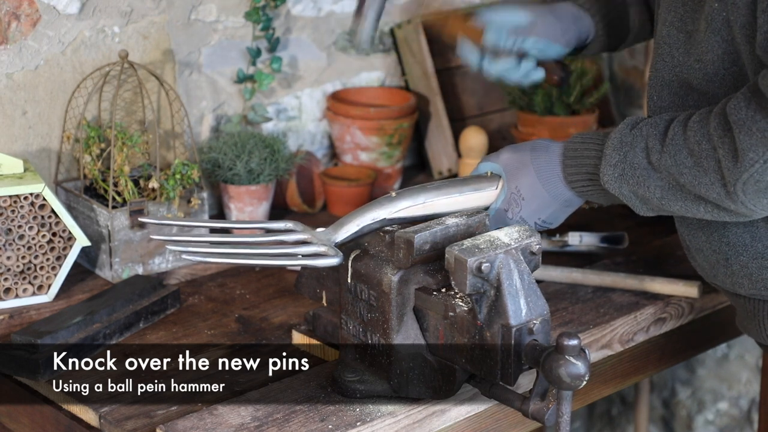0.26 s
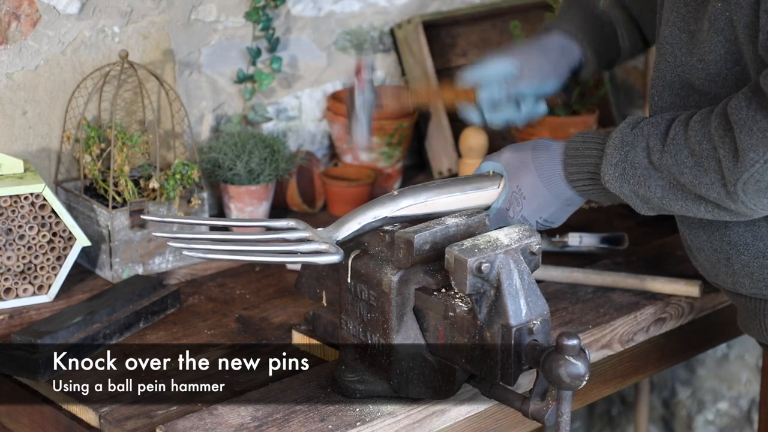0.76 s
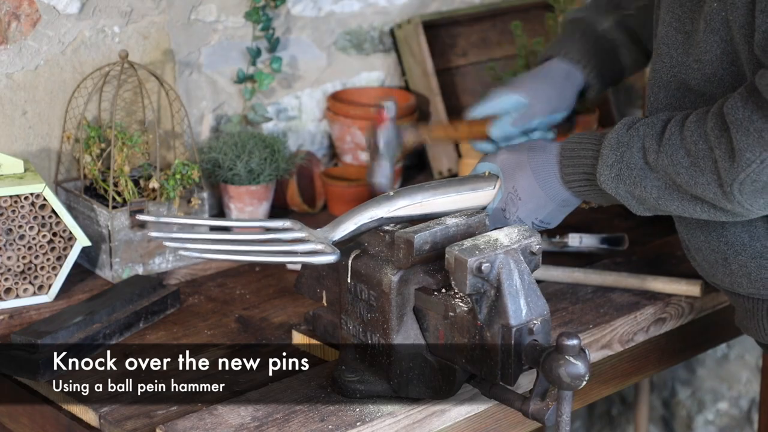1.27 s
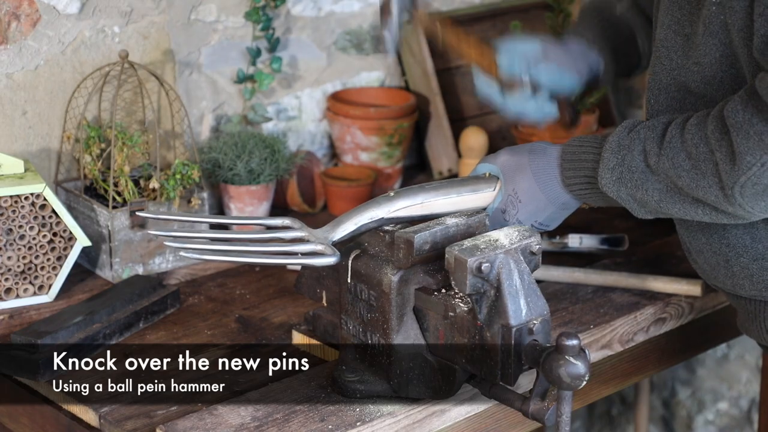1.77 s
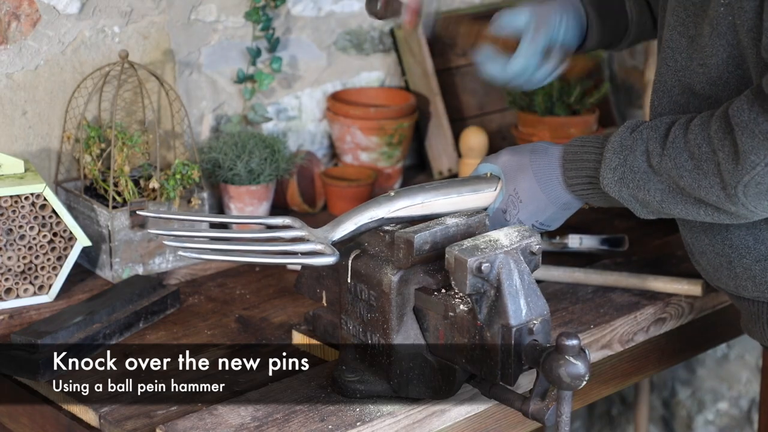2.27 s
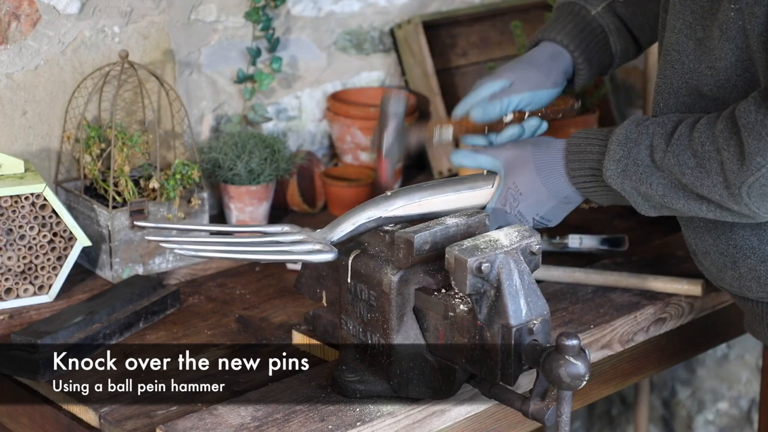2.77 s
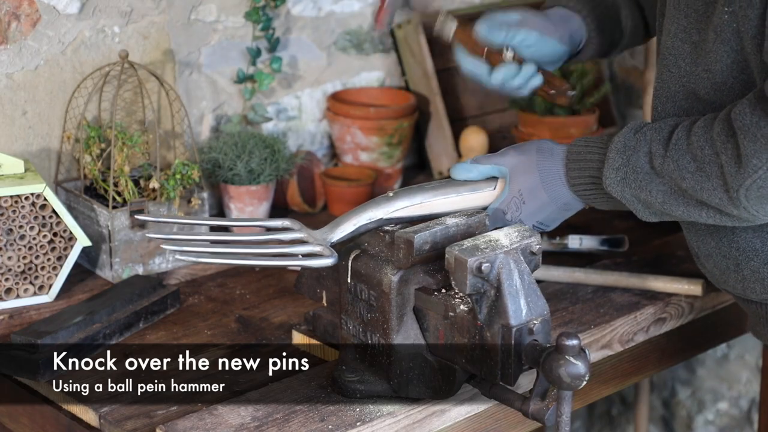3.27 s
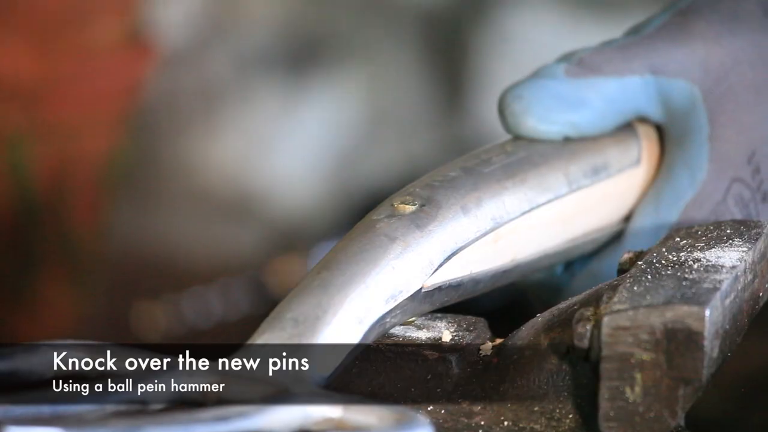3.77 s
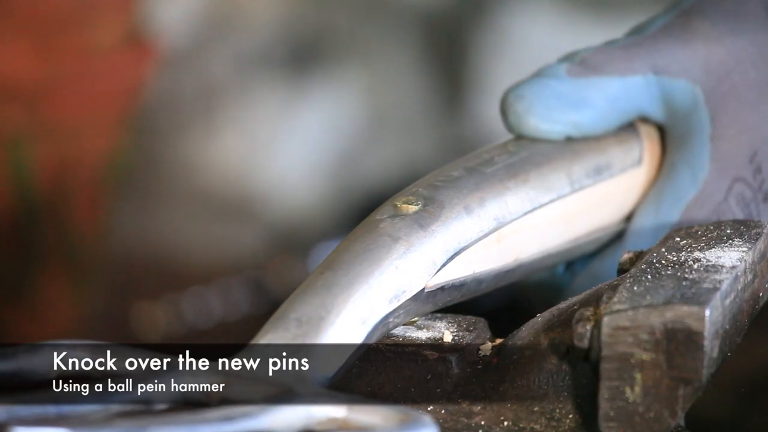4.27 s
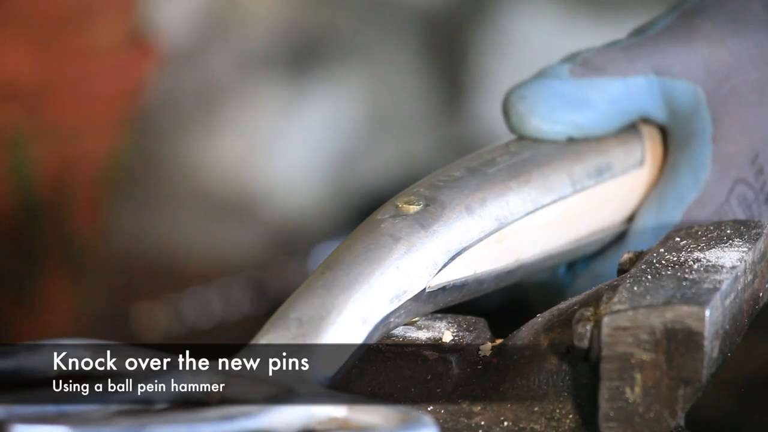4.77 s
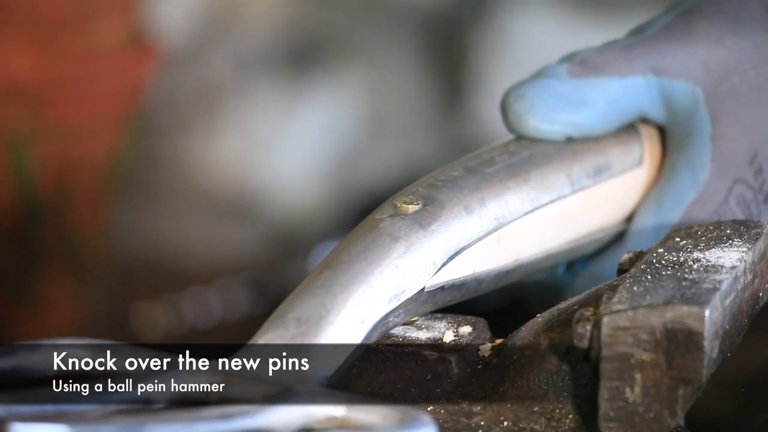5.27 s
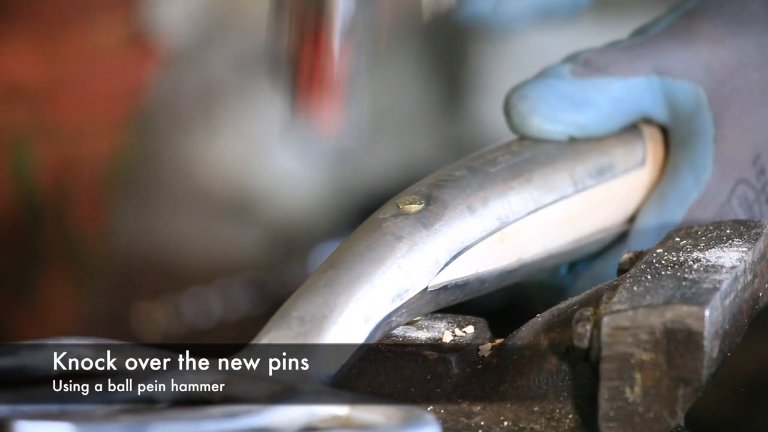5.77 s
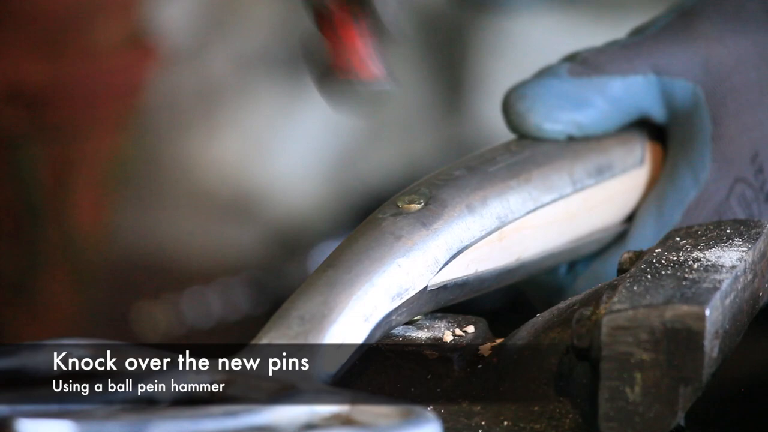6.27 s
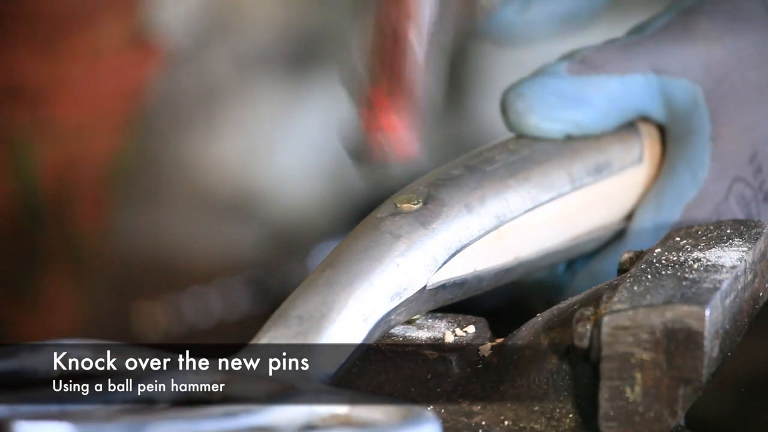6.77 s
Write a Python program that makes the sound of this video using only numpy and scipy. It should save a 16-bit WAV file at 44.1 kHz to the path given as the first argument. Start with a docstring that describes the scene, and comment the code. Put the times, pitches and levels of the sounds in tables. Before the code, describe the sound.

In a small workshop, a hammer strikes a brass pin set in a steel fork socket resting on a vice. Eight quick, even blows come first, then nearly a second's gap, one light tap and a second steady run to the end. Each is a hard mid-pitched clank with a bright crack, slight thin ringing and a short room tail. The microphone is close and the loudest blows slightly overload it.

```python
"""A hammer peens a brass pin in the steel socket of a garden fork that rests on a vice, in a small workshop.
Each blow is a click that rings the damped modes of socket, vice and bench and starts a burst of crack noise.
Thin resonances ring in tines, shank, vice jaw, hammer head and socket; near echoes and a noise tail make the room.
Shaped noise is the room tone, and the loudest swings overload the microphone input lopsidedly."""
import sys
import numpy as np
from scipy import signal
from scipy.fft import rfft, irfft
from scipy.io import wavfile

SR = 44100
rng = np.random.default_rng(int(sys.argv[2]) if len(sys.argv) > 2 else 0)


def inscribe(sig):
    """Save sig as 16-bit PCM at rate SR to the path in sys.argv[1].

    A 1-D sig is mono; a 2-D sig holds one channel per row.
    Samples are clipped to [-1, 1] before scaling.
    """
    pcm = np.round(np.clip(np.atleast_2d(sig).T, -1, 1) * 32767)
    wavfile.write(sys.argv[1], SR, pcm.astype(np.int16))


def volts(x):
    """Linear amplitude factor 10**(x/20) for a level x in dB, scalar or array-like."""
    e = np.asarray(x, float) / 20
    return 10 ** e


N = 308700  # samples, 7 s

# The hammer blows. Each row: start in seconds, strength in dB, hardness of contact in dB,
# base level of the tine ring in dB, base level of the tine tip ring in dB.
BLOWS = [(0.0178, -1.84, -8.5, -37, -54.5), (0.3153, -0.74, -1.5, -56.5, -71.5),
         (0.6077, -1, 4.5, -52.5, -62), (0.897, 0, 4, -42, -57), (1.1799, 0.26, 4, -37.5, -53.5),
         (1.464, 0, 4, -37.5, -60), (1.7529, -2.5, -2.5, -54, -70), (2.0367, -0.7, 4.5, -46.5, -48.5),
         (2.9947, -13, -1.5, -79, -92), (3.3101, -4, -2.5, -52, -63), (3.6014, -1.3, 2, -63.5, -72),
         (3.8807, 0, 5.5, -61, -71), (4.155, 0, 1, -33.5, -66), (4.4353, -0.5, 3.5, -43.5, -75),
         (4.7105, -3.5, -1.2, -55.5, -78.5), (4.9866, -1, 0.5, -65, -76.5), (5.2576, -0.7, 0.5, -39, -61.5),
         (5.5357, -1.5, 3, -59.5, -78.5), (5.847, -0.4, 4, -55, -75), (6.1238, -2.5, -12, -77.5, -79),
         (6.4146, -0.9, 7.5, -59, -80.5), (6.6906, -2, 5.5, -60, -75), (6.9747, -2, 2.5, -55.5, -74)]


def kicks(blow_db):
    """The hammer hits: one click per blow, over a floor too small to hear."""
    clicks = np.full(N, 1e-18)
    clicks[[round(row[0] * SR) for row in BLOWS]] = volts(blow_db)
    return clicks


def ring(modes, blow_db, spread_db):
    """Every blow strikes every mode, a little differently; neighbouring modes start in opposite sense."""
    out = np.zeros(N)
    chance = rng.standard_normal((len(BLOWS), len(modes)))
    for k, (hz, level_db, t60) in enumerate(modes):
        sense = (-1) ** k
        clicks = sense * kicks(blow_db + level_db + spread_db * chance[:, k])
        # two-pole resonator: a sine that falls 60 dB in t60
        radius = volts(-60 / (t60 * SR))
        angle = 2 * np.pi * hz / SR
        out += signal.lfilter([0, np.sin(angle)], [1, -2 * radius * np.cos(angle), radius ** 2], clicks)
    return out


def dying(clicks, t60):
    """Every click starts an envelope that falls 60 dB in t60 seconds."""
    return signal.lfilter([1], [1, -volts(-60 / (t60 * SR))], clicks)


def at_hz(points, hz, column=1):
    """Read a table column on a log-frequency axis."""
    points = np.array(points)
    return np.interp(np.log(hz), np.log(points[:, 0]), points[:, column])


def coloured(x, points):
    """Give a signal the spectrum of a table."""
    hz = np.maximum(np.fft.rfftfreq(len(x), 1 / SR), 1)
    return irfft(rfft(x) * volts(at_hz(points, hz)), len(x))


def in_time(curve, s):
    """Read a curve at the given times."""
    return np.interp(s, *np.transpose(curve))


# Socket, vice and bench, damped by hand and wood.
# Each row: frequency in Hz, level relative to the blow in dB, t60 in seconds.
BODY = [(97.2, -36.5, 0.31), (154.16, -29.5, 0.42), (219, -38.5, 0.12), (270, -26, 0.048),
        (379.2, -17.5, 0.091), (461, -27.5, 0.057), (607.6, -18, 0.17), (686, -20.5, 0.053),
        (743, -19.5, 0.14), (764, -22.5, 0.048), (986, -23.5, 0.041), (1029.5, -17.5, 0.24),
        (1045.2, -10.5, 0.072), (1150.6, -12.5, 0.066), (1204.5, -21.5, 0.19), (1368, -18, 0.052),
        (1575, -32.5, 0.15), (1850, -16.5, 0.075), (1944, -12, 0.032), (2200, -18, 0.044),
        (2440, -20, 0.061), (2600, -14.5, 0.04), (2740, -14.5, 0.035), (2890, -17, 0.06),
        (3273, -14, 0.041), (3500, -27, 0.014), (4060, -24, 0.08), (4200, -33, 0.0083), (5700, -31, 0.062),
        (7150, -33.5, .02)]


def body_knock(strength):
    """The heavy knock: damped modes of socket, vice and bench."""
    return ring(BODY, strength, spread_db=1.0)


# Colour of the contact crack. Each row: frequency in Hz, relative density in dB per Hz.
CRACK = [(600, -40), (1500, -19.5), (2500, -12), (3500, -5.5), (5000, -13), (8000, -18), (12000, -29.5),
         (17000, -34.5)]


def crack(blow_db, level_db=-4, t60=0.046):
    """Steel on brass and socket on jaws: a short burst of noise, new each time."""
    noise = coloured(rng.standard_normal(N), CRACK)
    return dying(kicks(blow_db + level_db), t60) * noise


def seated(x, touch_db=-22, seat_ms=0.69):
    """The face touches the pin lightly; the full blow lands when the socket seats on the vice."""
    full_blow = np.pad(x, (round(seat_ms * SR / 1000), 0))[:N]
    return volts(touch_db) * x + full_blow


# Tines, free steel. Each row: frequency in Hz, offset from the tine ring level of the blow in dB, t60 in seconds.
TINES = [(3323, -2, .75), (8050, -22, .3)]
# Tine tips. Each row: frequency in Hz, offset from the tip ring level of the blow in dB, t60 in seconds.
TINE_TIPS = [(5464, 0, .7)]


def tine_rings(tines, tips):
    """Tines and their tips sing thinly, at levels set blow by blow."""
    return ring(TINES, tines, spread_db=.4) + ring(TINE_TIPS, tips, spread_db=.4)


# Shank, free steel. Each row: frequency in Hz, offset from the curve below in dB, t60 in seconds.
SHANK = [(2121, -6, .42)]
# Shank ring as the hand tightens and eases. Each row: time in seconds, base level under a 0 dB blow in dB.
SHANK_RING = [(0, -45), (1.1, -37.5), (1.5, -30), (3.0, -25), (3.6, -26), (3.88, -21), (4.16, -31.5),
              (4.5, -39), (6.4, -37), (6.7, -28)]


def shank_ring(s, strength):
    """The shank rings more or less as the hand grips it."""
    return ring(SHANK, strength + in_time(SHANK_RING, s), spread_db=1)


# The vice jaw. Each row: frequency in Hz, offset from the curve below in dB, t60 in seconds.
VICE = [(1030, 0, .55)]
# Vice tone as the fork shifts on the jaw. Each row: time in seconds, base level under a 0 dB blow in dB.
VICE_RING = [(0, -43.5), (2.0, -38.5), (4.2, -39), (4.451, -45.5), (5.9, -45.5), (6.101, -33), (7, -37)]


def vice_tone(s, strength):
    """The vice jaw keeps a faint tone that varies as the fork shifts on it."""
    return ring(VICE, strength + in_time(VICE_RING, s), spread_db=1)


# Hammer head, free steel. Each row: frequency in Hz, offset from the curve below in dB, t60 in seconds.
HEAD = [(10060, -3, .5), (10150, -1, .4), (6856, 2, .4)]
# Head ring, which wakes when blows land off the centre of the face.
# Each row: time in seconds, base level under a 0 dB blow in dB.
HEAD_RING = [(4.45, -91), (4.71, -59), (4.98, -86.5), (5.27, -86), (5.53, -58), (5.85, -63), (6.2, -58.5),
             (7, -67)]


def head_ring(s, strength):
    """The hammer head rings high and thin on off-centre blows."""
    return ring(HEAD, strength + in_time(HEAD_RING, s), spread_db=1)


# High socket rings, favoured by hard contacts.
# Each row: frequency in Hz, level before strength, hardness and seating in dB, t60 in seconds.
SOCKET = [(6950, -47, .22), (8950, -50, .2), (10370, -67, .36), (11310, -59, .28), (12310, -64, .3),
          (13800, -60, .13), (14580, -60, .14)]


def socket_rings(s, strength, hardness, reseated_s=2.5, reseated_db=-8):
    """Hard contacts ring the socket; it is seated more firmly, and rings less, for the second pin."""
    seating = reseated_db * (s > reseated_s)
    return ring(SOCKET, strength + .6 * hardness + seating, spread_db=5)


# Near walls and bench. Each row: delay in seconds, level before dulling in dB.
ECHOES = [(.0046, -5.5), (0.0119, -6.5), (0.017, -4.5), (0.0328, -15), (0.0402, -11.5), (.053, -19),
          (.068, -25.5)]


def walls(x, wall_hz=3500):
    """Direct sound and its near echoes, dulled by a gentle low-pass."""
    echoes = sum(volts(db) * np.pad(x, (round(lag * SR), 0))[:N] for lag, db in ECHOES)
    return x + signal.sosfilt(signal.butter(1, wall_hz, fs=SR, output="sos"), echoes)


# Diffuse tail. Each row: frequency in Hz, level before strength and hardness in dB, t60 in seconds.
TAIL = [(62.5, -18, 0.27), (169, -3, 0.43), (300, -3.5, 0.27), (660, 1, 0.25), (1090, 3, .27),
        (1554, -5, 0.26), (2850, -6.5, 0.28), (4100, -20.5, 0.18), (6700, -27, 0.15), (9950, -37.5, 0.089),
        (16000, -43, 0.095)]
# Likeness of the tail from blow to blow. Each row: frequency in Hz, shared part of the power from 0 to 1.
ALIKE = [(200, .95), (1000, .8), (3000, .55), (6000, .15)]


def diffuse(strength_db, hardness_db, build_s=0.00089, soft_hz=3000):
    """Sound from all sides of the fork fills the room and dies band by band; hard blows brighten the top."""
    out = np.zeros(N)
    s = np.arange(SR) / SR
    edges = 40 * 2 ** np.arange(0, 9.1, .5)  # half octaves, Hz
    white = rng.standard_normal((2, N + SR))  # neighbouring bands take different noise
    for k, (low, high) in enumerate(zip(edges, edges[1:])):
        band = signal.sosfilt(signal.butter(2, [low, high], "band", fs=SR, output="sos"), white[k % 2])
        hz = np.sqrt(low * high)
        t60, alike = at_hz(TAIL, hz, column=2), at_hz(ALIKE, hz)
        # hardness fades in over the octave above soft_hz
        brightness = hardness_db * np.clip(np.log2(hz / soft_hz), 0, 1)
        blows = kicks(at_hz(TAIL, hz) + strength_db + brightness)
        shape = volts(-60 * s / t60) * (1 - np.exp(-s / build_s))
        # the same paths answer every blow; a slightly moved pin and hand scramble the short waves
        same = signal.oaconvolve(blows, shape * band[N:])[:N]
        fresh = signal.oaconvolve(blows, shape)[:N] * band[:N]
        out += np.sqrt(alike) * same + np.sqrt(1 - alike) * fresh
    return out


# Colour of the room tone. Each row: frequency in Hz, relative density in dB per Hz.
AIR = [(18, -45), (30, -12), (86, 4.5), (233, 0), (336, -6.5), (684, -3.5), (1190, -5), (1720, -15),
       (3140, -21), (5170, -44), (16000, -52)]


def room_tone(level_db=-64):
    """Steady shaped noise, set to its level by rms."""
    noise = coloured(rng.standard_normal(N), AIR)
    return volts(level_db) * noise / np.sqrt(np.mean(noise ** 2) + 1e-20)


def scene():
    """Knock and crack echo off the near walls; room tail, thin rings and room tone are added."""
    s, strength, hardness, tines, tips = np.transpose(BLOWS)
    contact = body_knock(strength) + crack(strength + hardness)
    knock = walls(seated(contact))
    rings = tine_rings(tines, tips) + shank_ring(s, strength) + vice_tone(s, strength)
    rings += head_ring(s, strength) + socket_rings(s, strength, hardness)
    tail = seated(diffuse(strength, hardness))
    return (knock + tail + rings + room_tone())[None]


def low_pass(x):
    """Removes everything above the highest recorded frequency."""
    return signal.sosfilt(signal.butter(12, 16600, fs=SR, output="sos"), x)


def record(dry):
    """The input stage flattens upward swings late and hard, downward ones early and softly; then band limits."""
    top, bottom = .6, .37  # largest swing up and down, of full scale
    up = dry / (1 + (np.abs(dry) / top) ** 6) ** (1 / 6)
    down = bottom * np.tanh(dry / bottom)
    bent = np.where(dry > 0, up, down)
    coupled = signal.sosfilt(signal.butter(2, 38, "high", fs=SR, output="sos"), bent)  # Hz
    cut = signal.sosfilt(signal.cheby2(12, 60, 16500, fs=SR, output="sos"), coupled)  # stopband dB, edge Hz
    return low_pass(cut)


dry = scene()
out = record(dry)
inscribe(out)
```